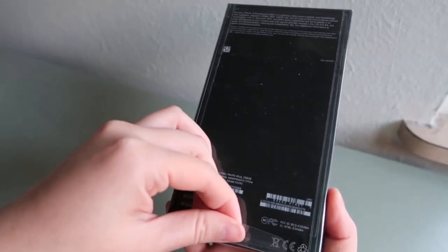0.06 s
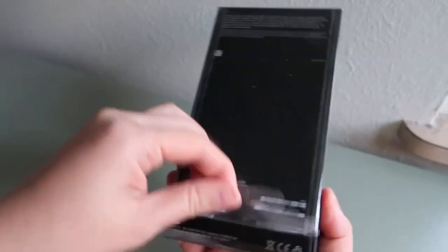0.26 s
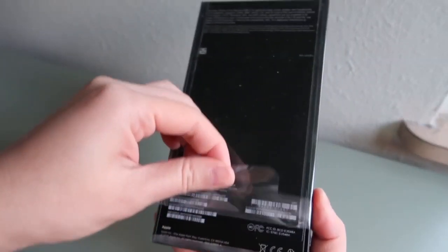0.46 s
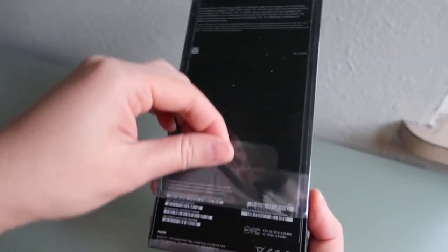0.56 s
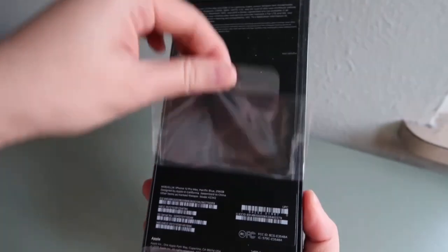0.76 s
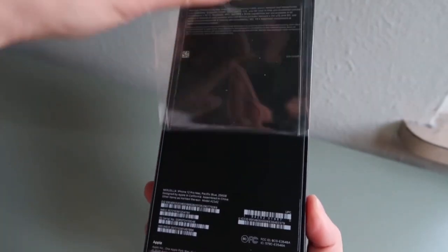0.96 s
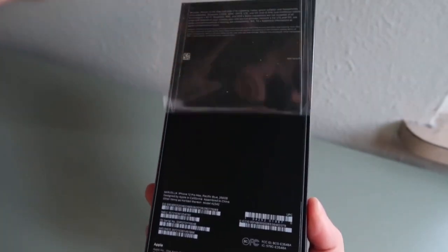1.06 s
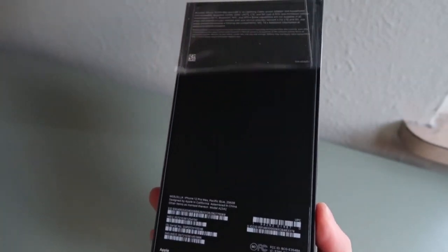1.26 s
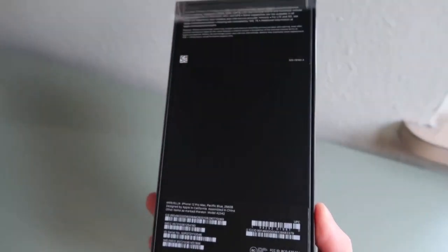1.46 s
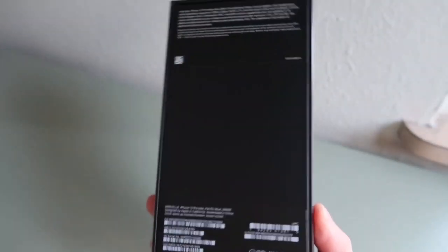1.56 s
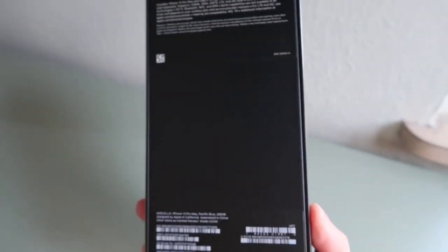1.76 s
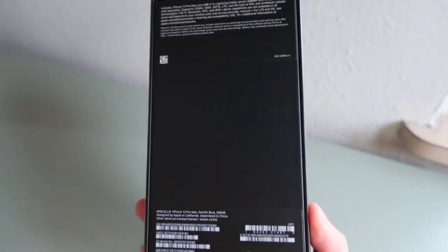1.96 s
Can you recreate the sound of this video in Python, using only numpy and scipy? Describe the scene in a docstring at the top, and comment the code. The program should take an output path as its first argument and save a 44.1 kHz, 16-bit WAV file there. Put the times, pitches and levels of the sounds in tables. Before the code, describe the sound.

Plastic film is peeled off a cardboard box, close by in a small, quiet room. The tab tears loose with a loud crack, the film crackles over a soft hiss, then comes free with a crumpling flap.

```python
"""A clear seal film is peeled by its tab off a cardboard box, close by in a small, quiet room.
First the tab tears loose with a loud crack and the loose end flutters against the box. Then the stiff
film snaps as it bends, while the glue lets go with a soft, swelling hiss and fingers bump the box.
At about 1.5 s the sheet slides over the box face and comes free with a crumpling flap that sets the
cardboard ringing. A low handling rumble lingers to the end."""
import sys
import numpy as np
from scipy import signal
from scipy.fft import rfft, irfft
from scipy.io import wavfile

SR = 44100
rng = np.random.default_rng(int(sys.argv[2]) if len(sys.argv) > 2 else 0)


def wav_record(signal):
    """Record a signal, one row per channel, as 16-bit PCM in the file named by sys.argv[1]."""
    frames = np.transpose(np.atleast_2d(signal))
    bounded = np.clip(frames, -1, 1)
    # unit amplitude maps onto the largest positive 16-bit level
    quanta = np.round(bounded * 32767).astype(np.int16)
    wavfile.write(sys.argv[1], SR, quanta)


N = 88200
T = np.arange(N) / SR

# The film buckles. Each row: start in seconds, ring pitch in Hz, ring decay in seconds,
# ring level in dB, crack level in dB.
SNAP_HITS = [(0.2316, 3190, 0.0038, -4.5, -9), (0.236, 3250, 0.0014, 9.5, -7.5),
             (0.2378, 5840, 0.0019, 6, -6), (.2442, 4217, 0.00048, 11.5, 1.5),
             (0.2441, 6180, 0.0012, 4.5, -5.5), (0.2466, 3350, 0.0026, 5, -4.5),
             (0.2507, 2890, 0.0007, 5, -21.5), (0.2493, 2130, 0.0017, -1, -5),
             (0.3315, 4850, 0.00034, -17, -23), (.3564, 3250, 0.002, -16.5, -42),
             (0.3703, 3190, 0.0037, -11.5, -52), (0.4692, 2875, 0.0014, -7, -9),
             (.4910, 2690, 0.00067, -13, -14.5), (0.5647, 4070, 0.0007, -15.5, -27),
             (0.6104, 3650, 0.00093, -23.5, -14), (0.6259, 3650, 0.002, -9, -17.5),
             (0.678, 3330, 0.00032, -5.5, -4.5), (0.6859, 3130, 0.00051, -8.5, -17),
             (0.7142, 2260, 0.00071, -23.5, -30), (0.719, 2000, 0.0013, -24, -24),
             (0.7471, 2960, 0.00062, -18, -12), (0.813, 2700, 0.00027, 1.5, -6.5),
             (0.839, 2630, .0008, -45, -23), (0.9221, 2790, 0.0022, -3, -4.5),
             (0.9329, 3560, 0.00037, -3, -2.5), (0.9368, 3480, 0.00056, -1.5, -15),
             (1.007, 5200, 0.00041, -15.5, -12), (1.017, 4090, .0005, -36, -18.5),
             (1.0501, 2940, 0.0018, -5, -0.5), (1.0621, 3740, 0.0016, -11, -27),
             (1.1008, 6050, 0.0003, -7, -13), (1.1143, 3940, .0005, -26, -38),
             (1.1503, 3130, 0.0015, -2.5, -6), (1.1629, 2870, 0.0023, -10, -11),
             (1.172, 4180, 0.00034, -18, -6), (1.1845, 2890, 0.00093, -17, -19.5),
             (1.242, 8640, 0.0008, -15, -15.5), (1.2551, 2946, 0.0021, -5.5, -5),
             (1.2741, 3150, 0.00023, -14, -10), (1.5139, 4340, 0.0007, -6.5, -19.5),
             (1.5186, 2410, 0.0012, -4.5, -5.5), (1.527, 2500, 0.00016, 3, -4.5),
             (1.5506, 2560, 0.00095, -5.5, -26), (1.5573, 5040, 0.0015, -0.5, -23),
             (1.5686, 1880, 0.00017, 5.5, -12.5), (1.5779, 3940, 0.0012, 4, -33),
             (1.5875, 4630, 0.0009, -1.5, -12.5)]
# The bright crack of a snap. Each row: frequency in Hz, level in dB.
CRACK_EQ = [(100, -41), (400, -23.5), (1200, -21), (2500, 0), (6500, 4), (9000, -0.5), (13000, 7),
            (16000, -15.5)]
# The grit in a snap's ring. Each row: multiple of the ring pitch, level in dB.
GRIT_EQ = [(.06, -51), (.2, -23.5), (.4, -14.5), (.65, -1), (1, 1), (2, -6.5), (4, -29.5)]
# The loose end flutters against the box. Each row: start in seconds, level in dB, decay in seconds.
FLUTTER_HITS = [(.2445, -12, 0.0044), (.2515, 0.5, 0.0063), (.264, -10.5, 0.0088), (.276, -14, 0.0023),
                (.296, -13.5, 0.0056), (.331, -17, 0.0053), (.357, -18.5, 0.0088), (.373, -26, 0.0081),
                (.394, -34, 0.0068), (.8125, -19.5, .002), (1.051, -19, 0.0026), (1.151, -25, 0.0034),
                (1.163, -23.5, .003), (1.274, -20, .003)]
# The flutter's hollow tone. Each row: frequency in Hz, level in dB.
FLUTTER_EQ = [(100, -49), (350, -38.5), (550, -11), (800, -5.5), (1100, 3.5), (1400, -8), (2000, -5),
              (3500, -26.5), (12000, -18.5)]
# The whole sheet flaps on the box. Each row: start in seconds, level in dB, decay in seconds.
FLAP_HITS = [(1.5268, -0.5, .005), (1.5325, -2, .005), (1.5509, 2.5, .008), (1.5640, -1.5, 0.0074),
             (1.5695, 6, 0.0068), (1.5877, -23, 0.0025), (1.612, -8.5, 0.009), (1.6525, -7, .012),
             (1.674, -21.5, .012)]
# The body of a flap. Each row: frequency in Hz, level in dB.
FLAP_EQ = [(40, -17), (120, -5), (300, 3.5), (600, 3), (1050, 4.5), (2000, -2), (4000, -8), (7000, -20.5),
           (15000, -39)]
# The box rings. Each row: pitch in Hz, level in dB, seconds to fall 60 dB.
BOX_RINGS = [(290, -22, 0.067), (553.6, -16, 0.27), (768, -15.5, 0.05), (978, -14.5, 0.072),
             (1078.6, -12, 0.14), (1680, -22.5, 0.087), (2112, -15, .07), (2530, -20.5, 0.052)]
# The freed sheet crumples. Each row: time in seconds, level in dB.
CRUMPLE_FADER = [(1.495, -62.5), (1.508, -38), (1.527, -27.5), (1.543, -37.5), (1.572, -20.5),
                 (1.596, -44.5), (1.607, -47), (1.66, -61.5), (1.74, -81.5)]
# The crumple's tone. Each row: frequency in Hz, level in dB.
CRUMPLE_EQ = [(60, -22), (120, 4), (500, -6), (1050, 9.5), (1400, -8), (2300, 2.5), (4000, 0), (7000, -4.5),
              (15000, -38)]
# The glue lets go. Each row: time in seconds, level in dB.
PEEL_FADER = [(0, -93), (.44, -76), (.6, -74.5), (.76, -56), (.9, -57), (1.0, -52.5), (1.12, -46),
              (1.3, -49), (1.4, -57.5), (1.49, -55.5), (1.56, -41), (1.7, -82)]
# The glue's hiss. Each row: frequency in Hz, level in dB.
PEEL_EQ = [(60, -19.5), (110, -3.5), (350, -8.5), (580, -0.5), (1000, -23.5), (1400, -14.5), (2200, -13.5),
           (3500, -15.5), (5500, -9.5), (12000, -27.5), (15000, -42.5)]
# The sheet slides over the box. Each row: time in seconds, level in dB.
SLIDE_FADER = [(1.36, -74), (1.43, -57), (1.49, -51), (1.51, -43.5), (1.55, -50), (1.6, -89)]
# The slide's tone. Each row: frequency in Hz, level in dB.
SLIDE_EQ = [(300, -20), (590, -12.5), (720, -20.5), (1000, 2.5), (1400, -27.5), (2280, 1), (3140, -27),
            (4900, -12.5), (10000, -15), (15000, -27.5)]
# Fingers and film bump the box. Each row: start in seconds, level in dB, decay in seconds.
BUMP_HITS = [(.246, -22.5, 0.005), (.625, -36, 0.014), (.751, -20, 0.009), (.812, -17.5, 0.0041),
             (.8425, -15.5, 0.018), (.8495, -14, 0.014), (.934, -18, 0.014), (1.051, -17.5, 0.011),
             (1.556, -6, 0.011), (1.654, -7, 0.024)]
# A bump's dull thud. Each row: frequency in Hz, level in dB.
BUMP_EQ = [(30, 0.5), (70, -3), (115, 8.5), (200, -1), (350, 3.5), (700, -3), (1500, -11.5), (5000, -47)]
# The handled box rumbles. Each row: time in seconds, level in dB.
RUMBLE_FADER = [(0, -61), (.7, -84), (.86, -68), (1.0, -53), (1.25, -57.5), (1.52, -57), (1.57, -35.5),
                (1.62, -50), (1.66, -49), (1.74, -62.5), (1.88, -64.5), (2, -60.5)]
# The rumble's low end. Each row: frequency in Hz, level in dB.
RUMBLE_EQ = [(20, -3.5), (45, 9.5), (85, 5.5), (140, -15), (300, -18.5), (1000, -63.5)]
# The length of the room's tail. Each row: frequency in Hz, seconds to fall 60 dB.
ROOM_DECAY = [(100, 0.21), (400, 0.35), (1000, 0.16), (3000, 0.29), (7000, 0.23), (15000, 0.093)]
# The tail's tone before it decays. Each row: frequency in Hz, level in dB.
ROOM_EQ = [(100, 3), (400, -8.5), (1000, 4.5), (2200, 0), (4000, -6), (8000, 3), (15000, 6.5)]
# The quiet noise bed. Each row: frequency in Hz, level in dB.
BED_EQ = [(20, -4.5), (45, -8), (80, -5), (130, -21), (180, -18), (280, -31), (420, -16), (650, -24.5),
          (2000, -26.5), (4200, -33), (8000, -42), (11000, -27), (12500, -53), (16000, -65.5)]
# Stereo width. Each row: frequency in Hz, side gain in dB.
SIDE_EQ = [(100, -15), (500, -15), (1400, -15), (2500, -14), (3700, -10), (5500, -4), (8000, -1),
           (15000, -1)]
# The left microphone port trails the right. Each row: frequency in Hz, lag in radians.
PORT_LAG = [(100, 0), (1200, .01), (2500, .07), (5200, .2), (7000, .45), (9000, .75), (11000, 1.55),
            (13000, 1.9), (16000, 2.2)]


def snaps(size=4096, grit_gain=0.89, crack_s=.00045, low_cut_hz=580):
    """Each buckle of the film is a crack and a few cycles of rough ring; gives mid and side."""
    mid, side, t = np.zeros(N), np.zeros(N), T[:size]
    for start, hz, decay_s, ring_db, crack_db in SNAP_HITS:
        grit_eq = [(hz * multiple, db) for multiple, db in GRIT_EQ]
        grit = mirrored_burst(decay_s, grit_eq)
        crack = mirrored_burst(crack_s, CRACK_EQ)
        attack = 1 - np.exp(-t * hz)
        ring = unit(np.sin(2 * np.pi * hz * t) * np.exp(-t / decay_s) * attack)
        ring_gain, crack_gain = from_db(ring_db), from_db(crack_db)
        add(mid, start, ring_gain * unit(ring + grit_gain * grit) + crack_gain * crack)
        # fresh noise on the side: each snap reaches the two ports a little unlike
        add(side, start, ring_gain * burst(decay_s, grit_eq) + crack_gain * burst(crack_s, CRACK_EQ))
    return signal.sosfilt(signal.butter(2, low_cut_hz, "high", fs=SR, output="sos"), [mid, side])


def mirrored_burst(decay_s, eq, echo_s=.0008, echo_db=-4.5):
    """A puff of noise, then a softer one for its bounce off the box face."""
    direct = burst(decay_s, eq)
    bounce = np.roll(burst(decay_s, eq), int(echo_s * SR))
    return unit(direct + from_db(echo_db) * bounce)


def flutters():
    """The film's loose end pats against the box."""
    return contacts(FLUTTER_HITS, FLUTTER_EQ)


def flaps():
    """The sheet flaps and sets the box ringing."""
    hits = contacts(FLAP_HITS, FLAP_EQ)
    return hits + sum(box_ring(hits, hz, db, t60_s) for hz, db, t60_s in BOX_RINGS)


def crumple():
    """The freed sheet crumples in a spray of uneven clicks."""
    return fader(CRUMPLE_FADER) * grains(CRUMPLE_EQ, per_s=2700, spread_db=5.0)


def peel():
    """The glue lets go in tiny clicks, dense enough to blur into hiss."""
    return fader(PEEL_FADER) * grains(PEEL_EQ, per_s=4000, spread_db=3.0)


def slide():
    """The sheet rubs over the box face just before it comes free."""
    return fader(SLIDE_FADER) * noise(SLIDE_EQ)


def bumps():
    """Fingers and film thud on the box, and its panel booms faintly."""
    hits = contacts(BUMP_HITS, BUMP_EQ)
    return hits + box_ring(hits, hz=111, db=-6.5, t60_s=0.17)


def box_ring(hits, hz, db, t60_s):
    """One cardboard resonance, its level set against the hits that drive it."""
    mode = np.sin(2 * np.pi * hz * T) * from_db(-60 * T / t60_s)
    ring = unit(signal.fftconvolve(hits, mode)[:N])
    return from_db(db) * ring * np.sqrt(np.sum(hits ** 2))


def rumble():
    """The box rumbles low as it is handled."""
    return fader(RUMBLE_FADER) * noise(RUMBLE_EQ)


def wall_echo(x, delay_s=.0079, db=-16):
    """One soft slap off the wall behind the box."""
    hz = np.fft.rfftfreq(2 * N, 1 / SR)
    return from_db(db) * irfft(rfft(x, 2 * N) * np.exp(-2j * np.pi * hz * delay_s))[:N]


def room_tail(bands=10, build_s=.002):
    """The room's reverb: octave bands of noise, each dying at its own rate."""
    white, bin_hz = rfft(rng.standard_normal(N)), np.fft.rfftfreq(N, 1 / SR)
    centres = np.geomspace(40, 16000, bands)
    tail = np.zeros(N)
    for hz, share in zip(centres, np.eye(bands)):
        band = irfft(white * at_hz(list(zip(centres, share)), bin_hz), N)
        tail += band * from_db(at_hz(ROOM_EQ, hz) - 60 * T / at_hz(ROOM_DECAY, hz))
    return unit(tail * (1 - np.exp(-T / build_s)))


def noise_bed(mid_db=-72.5, side_boost_db=8):
    """Faint, wide, steady noise under everything."""
    return from_db(mid_db) * widen(noise(BED_EQ), from_db(side_boost_db) * noise(BED_EQ))


def ports(pair):
    """Two close microphone ports: the left one lags in the treble."""
    lag = at_hz(PORT_LAG, np.fft.rfftfreq(2 * N, 1 / SR))
    return irfft(rfft(pair, 2 * N) * np.exp(.5j * np.array([-lag, lag])))[:, :N]


def widen(mid, side):
    """Mid and side to stereo: narrow in the bass, wide in the treble."""
    side = colour(side, SIDE_EQ)
    return np.array([mid + side, mid - side])


def contacts(rows, eq):
    """Soft hits, each a short puff of noise."""
    out = np.zeros(N)
    for start, db, decay_s in rows:
        add(out, start, from_db(db) * burst(decay_s, eq))
    return out


def burst(decay_s, eq, size=4096):
    """A dying puff of coloured noise, energy 1."""
    return unit(colour(rng.standard_normal(size) * np.exp(-T[:size] / decay_s), eq))


def grains(eq, per_s, spread_db):
    """Random tiny clicks of uneven size, rms 1."""
    sizes = from_db(spread_db * np.minimum(rng.exponential(1, N), 4))
    signs = rng.choice([-1, 1], N)
    fires = rng.random(N) < per_s / SR
    return unit(colour(sizes * signs * fires, eq)) * np.sqrt(N)


def noise(eq):
    """Steady coloured noise, rms 1."""
    return unit(colour(rng.standard_normal(N), eq)) * np.sqrt(N)


def colour(x, eq, size=4096):
    """Minimum-phase EQ: nothing rings ahead of a hit."""
    gains = from_db(at_hz(eq, np.fft.rfftfreq(size, 1 / SR)))
    cepstrum = irfft(np.log(gains))
    cepstrum[1:size // 2] *= 2
    cepstrum[size // 2 + 1:] = 0
    return signal.fftconvolve(x, irfft(np.exp(rfft(cepstrum))))[:len(x)]


def fader(points):
    """Gain over time, silent outside the given points."""
    return from_db(np.interp(T, *np.transpose(points), left=-np.inf, right=-np.inf))


def at_hz(points, hz):
    """Read a table on a log-frequency axis."""
    freqs, values = np.transpose(points)
    return np.interp(np.log(np.maximum(hz, 1)), np.log(freqs), values)


def add(out, start_s, x):
    """Mix a sound in on its cue."""
    i = int(start_s * SR)
    out[i:i + len(x)] += x[:N - i]


def from_db(db):
    """Decibels to gain."""
    return 10 ** (np.asarray(db) / 20)


def unit(x):
    """Scale to energy 1."""
    return x / np.sqrt(np.sum(x ** 2) + 1e-20)


def scene(snap_side_db=-5.5, room_db=-7):
    """Film and box up close, a wall behind them, a quiet room."""
    snap, snap_side = snaps()
    near = snap + peel() + crumple() + slide() + flutters() + flaps() + bumps()
    direct = widen(near + wall_echo(near), from_db(snap_side_db) * snap_side)
    tail = widen(room_tail(), room_tail())
    reverb = signal.fftconvolve(near[None], tail, axes=1)[:, :N]
    return ports(direct + from_db(room_db) * reverb) + noise_bed() + rumble()


def record(dry):
    """Soft saturation rounds the loudest peaks, and a steep filter cuts the very top."""
    ceiling, stopband_hz = 1.5, 16900
    rounded = ceiling * np.tanh(dry / ceiling)
    return signal.sosfilt(signal.cheby2(14, 60, stopband_hz, fs=SR, output="sos"), rounded)


dry = scene()
out = record(dry)
wav_record(out)
```